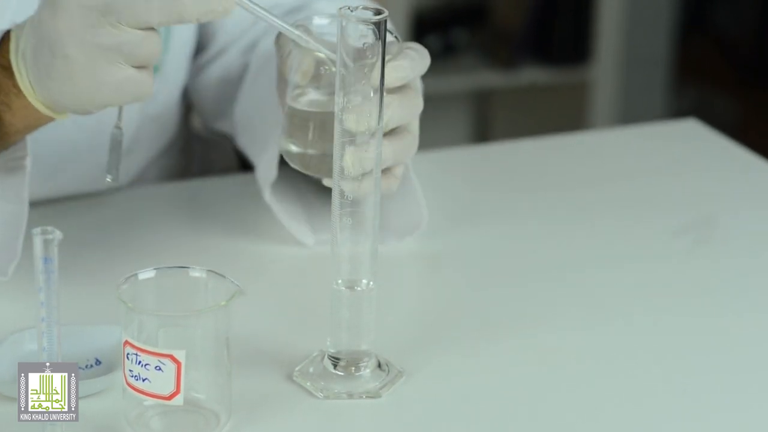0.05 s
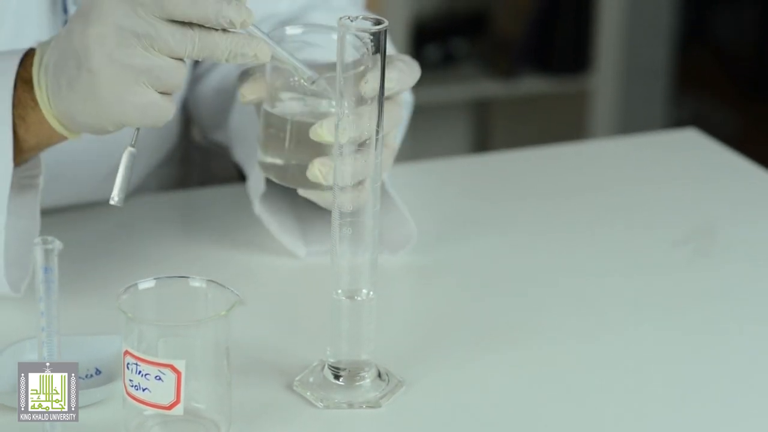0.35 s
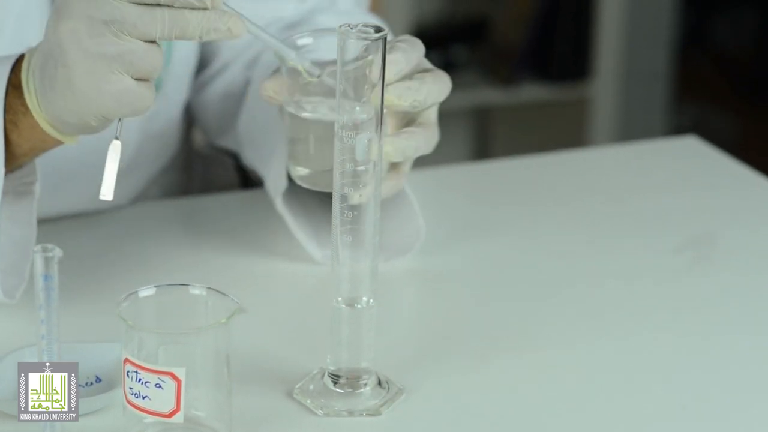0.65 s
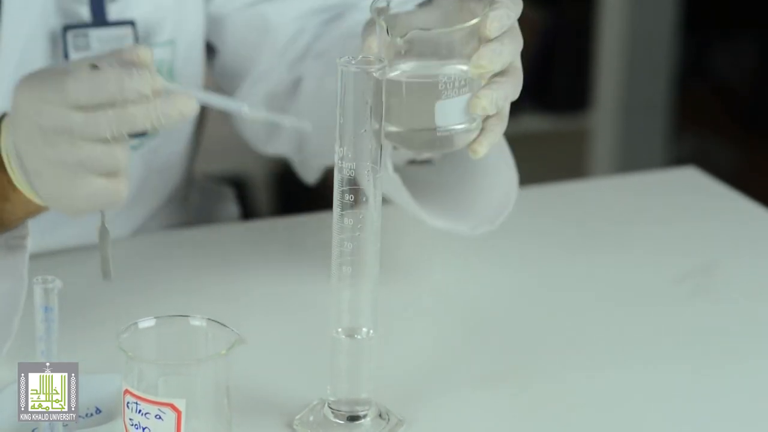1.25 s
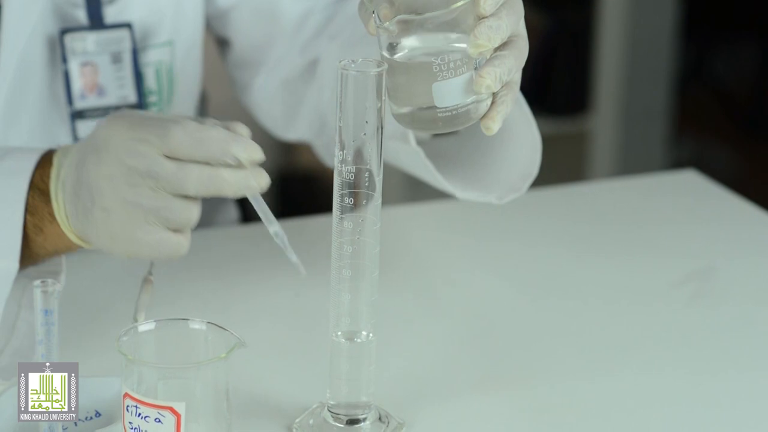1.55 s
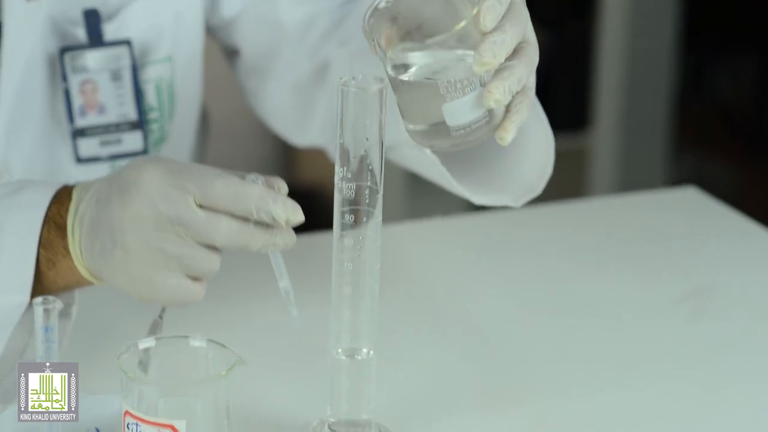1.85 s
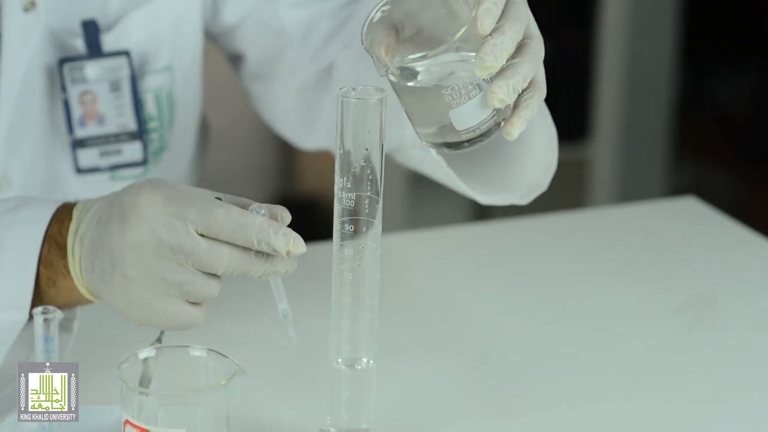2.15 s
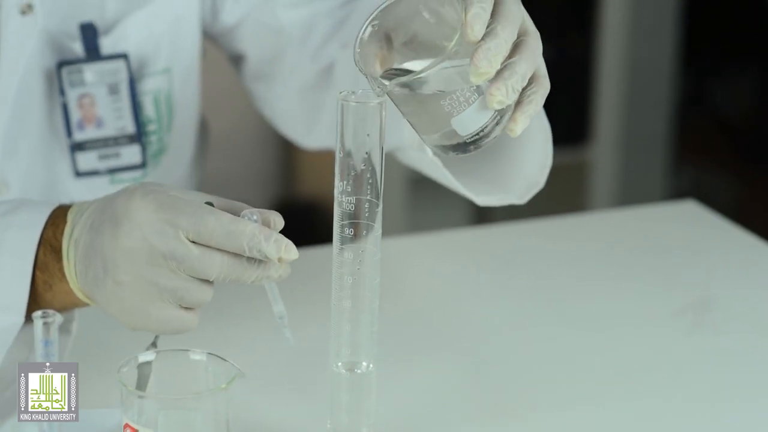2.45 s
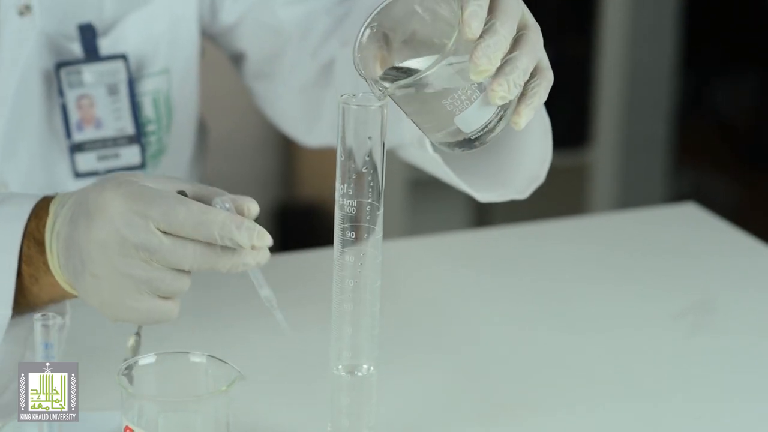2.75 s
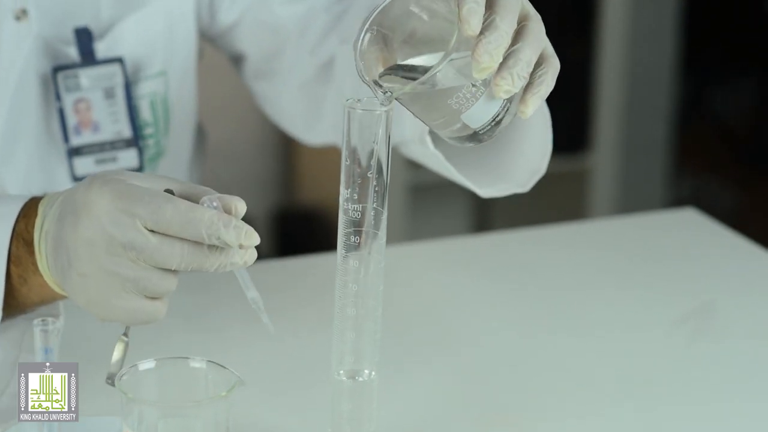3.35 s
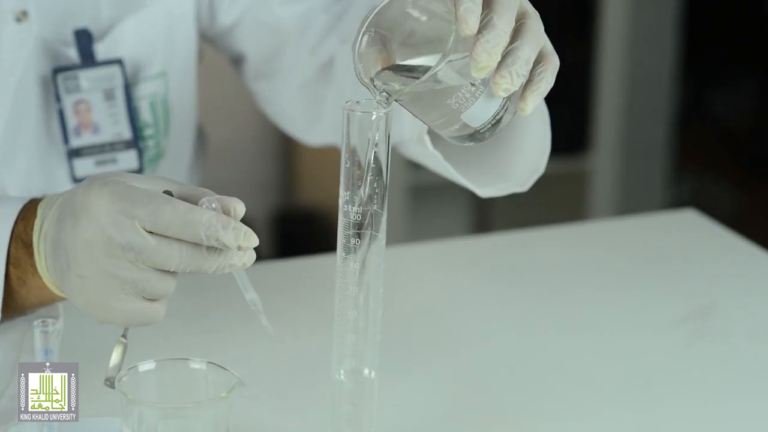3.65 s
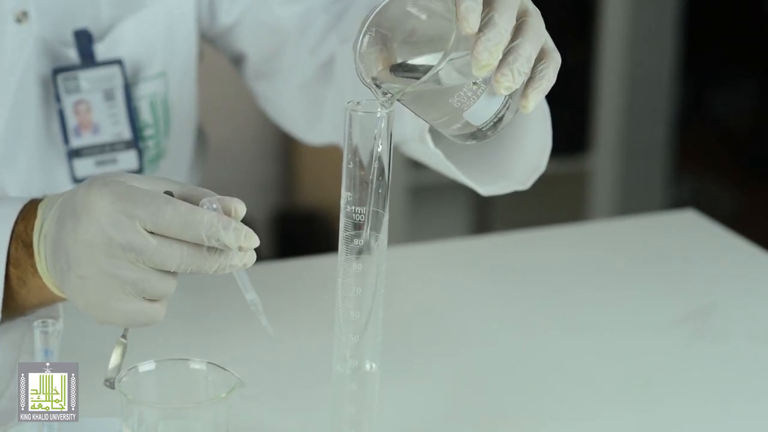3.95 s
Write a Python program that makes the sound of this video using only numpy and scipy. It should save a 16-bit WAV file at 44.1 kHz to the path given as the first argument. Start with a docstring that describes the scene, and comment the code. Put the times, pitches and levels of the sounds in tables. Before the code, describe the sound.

One glass clink with a dull bump, then faint drips and ticks over ventilation hum.

```python
"""A hand-held beaker knocks once on the rim of a glass cylinder: a short clink over a dull bump.
The spout then ticks faintly on the rim, with one much softer knock, as the pouring begins.
Small drops plip before and after, each trapping a bubble. A coat sleeve brushes along with the arm,
gloves crinkle, and ventilation drones throughout in the quiet laboratory."""
import sys
import numpy as np
from scipy import signal
from scipy.fft import rfft, irfft
from scipy.io import wavfile
from scipy.ndimage import uniform_filter1d

SR = 44100
rng = np.random.default_rng(int(sys.argv[2]) if len(sys.argv) > 2 else 0)


def generate_wav(signal):
    """Clip the signal to [-1, 1] and save it as 16-bit WAV at the path in sys.argv[1]."""
    frames = np.transpose(np.atleast_2d(signal))
    scaled = np.clip(frames, -1, 1) * 32767
    pcm = np.round(scaled).astype(np.int16)
    wavfile.write(sys.argv[1], SR, pcm)


N = 176400
GLASS_RISE_S = 0.0014  # attack of glass on glass, for knocks and ticks alike


def amp(db):
    """Decibels to gain."""
    return 10 ** (np.asarray(db) / 20)


def unit_rms(x):
    """Scales a signal to an rms of 1."""
    return x / np.sqrt(np.mean(x ** 2) + 1e-20)


def curve_at(points, hz):
    """Reads a curve on a log-frequency axis."""
    freq_hz, value = np.transpose(points)
    return np.interp(np.log(hz + 1), np.log(freq_hz + 1), value)


def add(mix, start_s, sound):
    """Mixes a sound in at its start time."""
    part = mix[max(round(start_s * SR), 0):][:len(sound)]
    part += sound[:len(part)]


def noise(spectrum, size):
    """Steady noise of a given colour, at an rms of 1."""
    colour = amp(curve_at(spectrum, np.fft.rfftfreq(size, 1 / SR)))
    return unit_rms(irfft(rfft(rng.standard_normal(size)) * colour, size))


def patchy_noise(spectrum, depth_db):
    """Coloured noise whose level drifts in patches of time and frequency."""
    bands = signal.stft(noise(spectrum, N), nperseg=512)[2]
    patches = uniform_filter1d(rng.standard_normal(bands.shape), size=10, axis=0)
    patches = unit_rms(uniform_filter1d(patches, size=6, axis=1))
    return unit_rms(signal.istft(bands * amp(depth_db * patches), nperseg=512)[1][:N])


def ring(modes, rise_s):
    """Struck modes swell over the contact time, then each dies at its own rate."""
    t = np.arange(SR // 2) / SR
    attack = 1 - np.exp(-t / rise_s)
    return attack * sum(amp(db - 60 * t / t60) * np.sin(2 * np.pi * hz * t) for hz, db, t60 in modes)


def ventilation():
    """Machine and mains hum swells and sags over a steady rush of air."""
    # tones of the hum: pitch_hz, level_db
    hum_tones = [(38.7, -55), (58.3, -36.5), (69.25, -42.5), (78.4, -54), (118.2, -55.5), (120, -60.5),
                 (177.2, -55)]
    # slow swell of the whole hum: time_s, gain_db
    swell = [(0, 2.5), (.2, -2), (.45, -1.5), (.62, 4), (.85, 1.5), (1.2, -4.5), (1.42, 0.5), (1.8, 1),
             (2.08, -5.5), (2.35, 0.5), (2.6, 3.5), (2.82, -3), (3.15, -5), (3.42, 0.5), (3.65, 2), (4, -4)]
    # low rush and thin hiss: freq_hz, relative_db
    air_colour = [(15, -30), (35, -15), (50, -3), (62, 4), (85, -1), (130, -3.5), (200, -7.5), (330, -11),
                  (520, -19), (850, -23), (1400, -28), (2500, -32), (6000, -37), (11000, -39.5),
                  (15800, -43)]
    wander_hz = 0.15
    t, hum = np.arange(N) / SR, np.zeros(N)
    for hz, db in hum_tones:
        drift = np.interp(t, np.linspace(0, t[-1], 9), rng.standard_normal(9))
        cycles = np.cumsum(hz + wander_hz * drift) / SR + rng.random()
        hum += amp(db) * np.sqrt(2) * np.sin(2 * np.pi * cycles)
    air = amp(-41) * patchy_noise(air_colour, depth_db=1)
    return hum * amp(np.interp(t, *np.transpose(swell))) + air


def sleeve():
    """Coat cloth brushes softly while the arm moves."""
    # rubbing cloth: freq_hz, relative_db
    cloth_colour = [(100, -19), (220, -6.5), (330, 4.5), (450, -6.5), (640, -2.5), (850, -1), (1080, -8.5),
                    (1600, -14), (2300, -21.5), (5000, -23.5), (15000, -33.5)]
    # the brushing follows the arm: time_s, level_db
    arm_moves = [(0, -52), (.25, -55.5), (.45, -58), (.66, -54), (.77, -47), (1.05, -45), (1.25, -48.5),
                 (1.55, -46.5), (1.66, -53.5), (2.05, -63), (2.3, -58), (2.7, -56), (3.0, -67), (3.22, -57),
                 (3.38, -48.5), (3.55, -52.5), (3.8, -51), (4, -54.5)]
    envelope = amp(np.interp(np.arange(N) / SR, *np.transpose(arm_moves)))
    return envelope * patchy_noise(cloth_colour, depth_db=1.63)


def drops():
    """Each drop traps a bubble that plips, rising slightly in pitch."""
    # bubbles: start_s, level_db, pitch_hz
    plips = [(0.019, -47, 1235), (.2245, -42.5, 1250), (0.681, -49, 1280), (3.1343, -51, 1130),
             (3.5873, -35.5, 1064), (3.676, -45, 1290)]
    rise_s, hold_s, t60_s, glide_per_s = 0.00046, 0.0059, 0.026, 2.1
    out, t = np.zeros(N), np.arange(SR // 10) / SR
    envelope = (1 - np.exp(-t / rise_s)) * amp(-60 * np.maximum(t - hold_s, 0) / t60_s)
    for start_s, db, hz in plips:
        cycles = np.cumsum(hz * (1 + glide_per_s * t)) / SR
        add(out, start_s, amp(db) * envelope * np.sin(2 * np.pi * cycles))
    return out


def glove_crinkles():
    """Gloved hands give off faint, bright puffs of friction."""
    # crinkles: start_s, level_db, length_s
    puffs = [(0.234, -52, 0.024), (.380, -56, .01), (.56, -57, .08), (1.47, -60, 0.14), (3.48, -56, .01),
             (3.763, -56, .01), (3.899, -51.5, .012), (3.91, -63, .05), (3.974, -56, .012)]
    # glove friction: freq_hz, relative_db
    glove_colour = [(1500, -25), (5000, -2), (9500, -6), (12500, 0), (15500, -3)]
    envelope, t = np.zeros(N), np.arange(N) / SR
    for start_s, db, length_s in puffs:
        envelope += amp(db) * np.sin(np.pi * np.clip((t - start_s) / length_s, 0, 1))
    return envelope * noise(glove_colour, N)


def beaker_clink(knocks):
    """Each knock snaps at the contact, rings both glasses and bumps the cylinder on the bench."""
    # ring of the two glasses: pitch_hz, level_db, t60_s
    glass_modes = [(2180, -23.5, 0.1), (2250, -36, 0.09), (3085, -42, .05), (3260, -45, .04),
                   (3420, -46, 0.052), (4958, -40.5, .09), (5252, -53, 0.29), (5650, -45, .05),
                   (5820, -31.5, 0.061), (5985, -44, .05), (6140, -40, .06), (7240, -48, .06),
                   (7325, -48, 0.099), (8430, -43, 0.13), (9900, -56, .06), (12130, -58, .06)]
    # dull bump on the bench: pitch_hz, level_db, t60_s
    bump_modes = [(247, -19, 0.092), (274, -7.5, 0.071), (559, -21, 0.079), (647, -27, 0.087),
                  (800, -28, 0.09), (1047, -33, 0.068), (1248, -30, 0.057)]
    # contact noise: freq_hz, relative_db
    snap_colour = [(120, -28), (250, -2.5), (550, 1.5), (1100, -5), (1700, -13), (2600, -27.5),
                   (3200, -21.5), (4100, -34.5), (7000, -30), (11000, -35), (15000, -52)]
    snap_db, snap_rise_s, snap_t60_s = -23, 0.00035, 0.065
    out, t = np.zeros(N), np.arange(SR // 2) / SR
    glass = ring(glass_modes, GLASS_RISE_S)
    bump = ring(bump_modes, rise_s=0.0049)
    snap_envelope = (1 - np.exp(-t / snap_rise_s)) * amp(snap_db - 60 * t / snap_t60_s)
    for start_s, glass_db, bump_db in knocks:
        snap = snap_envelope * noise(snap_colour, len(t))
        add(out, start_s, amp(glass_db) * (glass + snap) - amp(bump_db) * bump)
    return out


def bench_boom(knocks):
    """After each bump, a low boom builds in bench and room and dies away."""
    # low reverberation: freq_hz, relative_db
    boom_colour = [(150, -37), (225, -7), (275, 1.5), (335, -3.5), (410, -24.5), (560, -19.5), (700, -37),
                   (1100, -37), (1700, -55), (5000, -80)]
    send_db, peak_s, t60_s = -27, 0.057, 0.44
    out, t = np.zeros(N), np.arange(SR) / SR
    envelope = np.minimum(t / peak_s, 1) * amp(-60 * np.maximum(t - peak_s, 0) / t60_s)
    for start_s, _, bump_db in knocks:
        add(out, start_s, amp(bump_db + send_db) * envelope * noise(boom_colour, len(t)))
    return out


def spout_ticks():
    """The spout grazes the rim: a tiny tick, then a thin ring."""
    # light touches: start_s, tick_db, pitch_hz, ring_db
    touches = [(3.3772, -52, 5250, -56), (3.4795, -45, 12400, -54), (3.5885, -42, 5010, -74),
               (3.6431, -33.5, 4900, -51.5), (3.720, -48, 8300, -74), (3.7653, -41, 8350, -72),
               (3.901, -43, 12000, -60), (3.947, -48, 5500, -70), (3.9784, -50, 5080, -72)]
    # ring of the rim: pitch_hz, relative_db, t60_s
    rim_modes = [(5230, 0, 0.2), (5900, -11, .2), (12750, -13, .15)]
    tick_t60_s = 0.017
    out, rim = np.zeros(N), ring(rim_modes, GLASS_RISE_S)
    for start_s, tick_db, hz, ring_db in touches:
        tick = ring([(hz, tick_db, tick_t60_s)], GLASS_RISE_S)
        add(out, start_s, tick + amp(ring_db) * rim)
    return out


def room(direct):
    """The laboratory adds a few dulled reflections and a dark, diffuse tail."""
    # decay of the tail: freq_hz, t60_s
    decay_times = [(150, .5), (300, 0.38), (700, .3), (2200, .5), (6000, 0), (14000, 0.5)]
    # distinct reflections: delay_s, gain_db
    reflections = [(.0075, -15.5), (.036, -14.5), (0.059, -23), (.106, -27)]
    tail_db, treble_db, build_s, echo_cutoff_hz = -7.5, -8.5, 0.023, 7900
    hz, t, bands = signal.stft(rng.standard_normal(SR // 2), SR, nperseg=256)
    colour_db = curve_at([(400, 0), (2000, treble_db)], hz)[:, None]
    decay_db = 60 * t / curve_at(decay_times, hz)[:, None]
    build_up = np.minimum(t / build_s, 1)
    tail = signal.istft(bands * amp(colour_db - decay_db) * build_up, SR, nperseg=256)[1]
    tail *= amp(tail_db) / np.sqrt(SR * build_s)
    echoes = np.zeros(N)
    for delay_s, db in reflections:
        add(echoes, delay_s, amp(db) * direct)
    dull_echoes = signal.lfilter(*signal.butter(1, echo_cutoff_hz, fs=SR), echoes)
    return direct + dull_echoes + signal.fftconvolve(direct, tail)[:N]


def scene():
    """Glass and drops sound in the room, over gloves, sleeve and ventilation, in mono."""
    # the beaker meets the rim: start_s, glass_gain_db, bump_gain_db
    knocks = [(2.4590, 0, -0.5), (3.5880, -26, -20.5)]
    glass_and_drops = room(beaker_clink(knocks) + drops() + spout_ticks())
    return (glass_and_drops + bench_boom(knocks) + glove_crinkles() + sleeve() + ventilation())[None]


def record(dry):
    """A steep low-pass trims the very top of the treble."""
    cutoff_hz = 15800
    lowpass = signal.firwin(1023, cutoff_hz, window=("kaiser", 9), fs=SR)
    return signal.oaconvolve(dry, lowpass[None], "same")


dry = scene()
out = record(dry)
generate_wav(out)
```